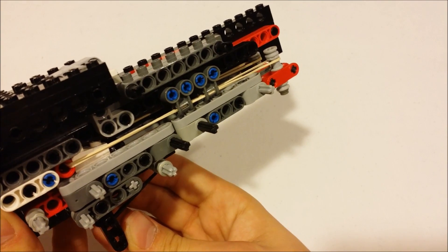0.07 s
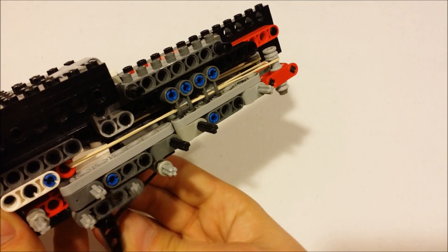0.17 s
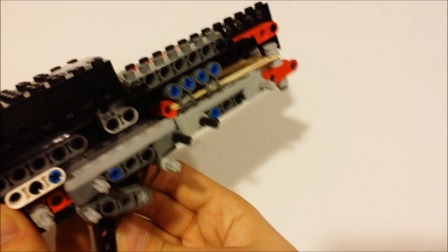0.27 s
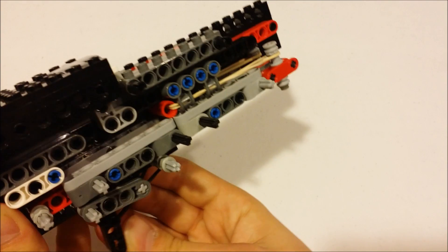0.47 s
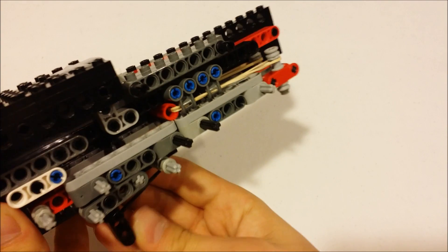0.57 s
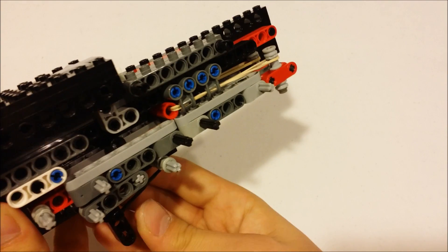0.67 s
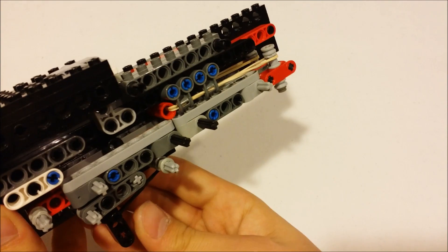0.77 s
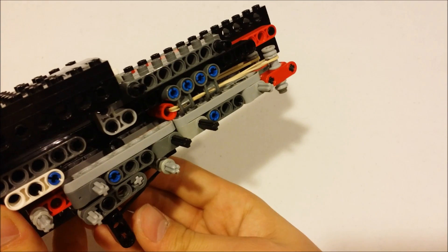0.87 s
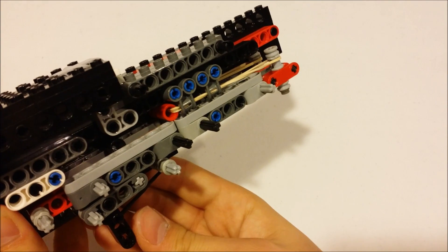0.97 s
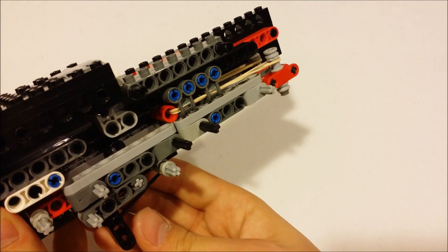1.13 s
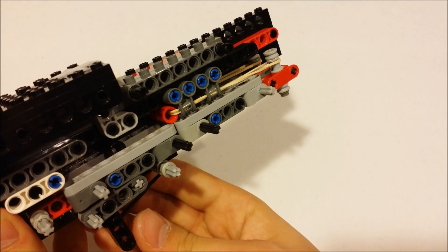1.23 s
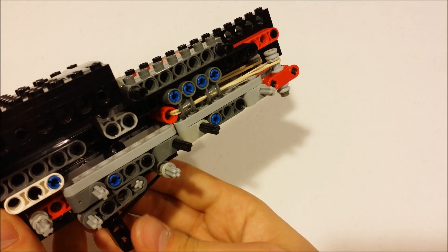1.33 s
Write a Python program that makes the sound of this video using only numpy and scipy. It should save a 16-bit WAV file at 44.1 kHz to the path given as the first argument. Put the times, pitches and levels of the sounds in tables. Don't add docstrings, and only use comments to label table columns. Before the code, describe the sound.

A hard plastic snap from a rubber-band toy shooter, then a small brick clatters down nearby

```python
import sys
import numpy as np
from scipy import signal
from scipy.io import wavfile
from scipy.ndimage import uniform_filter1d

SR = 44100
rng = np.random.default_rng(int(sys.argv[2]) if len(sys.argv) > 2 else 0)


def wav_out(sig):
    wavfile.write(sys.argv[1], SR, np.round(np.clip(np.atleast_2d(sig).T, -1, 1) * 32767).astype(np.int16))


def volts_from_decibels(level):
    exponent = np.asarray(level, float) / 20
    return 10 ** exponent


N = 61739


def evened(x):
    return x / np.sqrt(np.mean(x ** 2) + 1e-20)


def read(points, hz):
    f, value = np.transpose(points)
    return np.interp(np.log(hz + 1), np.log(f + 1), value)


def curve(points, column):
    rows = np.transpose(points)
    return np.interp(np.arange(N) / SR, rows[0], rows[column])


def sides(pan_db):
    return np.array([[pan_db / 2], [-pan_db / 2]])


def coloured(x, spectrum):
    hz = abs(np.fft.fftfreq(4096, 1 / SR))
    log_gain = np.log(volts_from_decibels(np.maximum(read(spectrum, hz), -100)))
    taps = np.fft.ifft(np.exp(np.conj(signal.hilbert(log_gain)))).real[:2048]
    return signal.fftconvolve(x, taps[None] / np.linalg.norm(taps), axes=1)[:, :N]


def resonate(x, hz, width_hz):
    r = np.exp(-np.pi * width_hz / SR)
    return signal.lfilter([1 - r, 0, r - 1], [1, -2 * r * np.cos(2 * np.pi * hz / SR), r * r], x)


def tilted(x, treble_db):
    low = signal.lfilter([.25], [1, -.75], x)
    return low + volts_from_decibels(treble_db) * (x - low)


# f/Hz, t60/s
ROOM_DECAY = [(200, 0.61), (700, 0.34), (2000, 0.33), (5000, 0.23), (10000, 0.2), (15000, 0.21)]
MONO_HZ = 400
LATE_DB, LATE_STRETCH = -19, 2.4


def tail():
    echoes = np.zeros((2, SR // 2))
    spacing = rng.integers(0, 12, (2, (SR // 2 - 121) // 12))
    at = np.arange(120, SR // 2 - 12, 12) + spacing
    np.put_along_axis(echoes, at, rng.choice([-1., 1.], at.shape), 1)
    hz, t, z = signal.stft(echoes, SR, nperseg=256)
    alike = 1 / (1 + (hz[:, None] / MONO_HZ) ** 2)
    z = np.array([z[0], alike * z[0] + np.sqrt(1 - alike ** 2) * z[1]])
    fall_db = -60 * t / read(ROOM_DECAY, hz)[:, None]
    decay = volts_from_decibels(fall_db) + volts_from_decibels(LATE_DB + fall_db / LATE_STRETCH)
    out = signal.istft(z * decay, SR, nperseg=256)[1]
    return out / np.linalg.norm(out[0])


def room(x):
    return signal.fftconvolve(x.mean(0)[None], tail(), axes=1)[:, :N]


def capsule(x, db):
    return x + volts_from_decibels([[db - 19], [db]]) * resonate(x, 9900, 330)


def hits(rows, colour, crack_s, click, trim_db, ring_db, wet_db, wet_treble_db, wet_ring_db):
    t = np.arange(800) / SR
    direct, wet = np.zeros((2, N)), np.zeros((2, N + SR))
    for s, db, pan, treble_db in rows:
        start = round(s * SR)
        shared = 0.82 * rng.standard_normal(len(t))
        crack = (shared + 1.1 * rng.standard_normal((2, len(t)))) * np.exp(-t / crack_s)
        crack[:, 0] -= click
        crack /= np.linalg.norm(crack, axis=1)[:, None]
        echo = tail()
        direct[:, start:][:, :len(t)] += volts_from_decibels(db + trim_db + sides(pan)) * tilted(crack, treble_db)
        wet[:, start:][:, :echo.shape[1]] += volts_from_decibels(db + trim_db + sides(-2)) * tilted(echo, treble_db)
    wet = volts_from_decibels(wet_db) * tilted(tilted(wet[:, :N], wet_treble_db), wet_treble_db)
    return capsule(coloured(direct, colour), ring_db) + capsule(coloured(wet, colour), wet_ring_db)


def slips():
    slips_per_s = 2300
    height = volts_from_decibels(2.9 * np.minimum(rng.exponential(1, (3, N)), 5))
    train = height * (rng.random((3, N)) < slips_per_s / SR)
    train = train * rng.choice([-1., 1.], (3, N)) + 0.6 * rng.standard_normal((3, N))
    return evened(train[:2] + train[2])


# f/Hz, level/dB
AIR_COLOUR = [(35, -38.5), (60, -10.5), (234, -3.5), (428, -18.5), (663, -19), (798, -18), (982, -21),
              (5550, -37.5), (15000, -47)]
# f/Hz, likeness/1
AIR_LIKENESS = [(60, .9), (180, .95), (400, .75), (700, .3), (1400, -.15), (3000, 0.), (15000, 0.)]
# f/Hz, width/Hz, level/dB
HUMS = [(72, 8.3, -75.5), (150, 6.7, -71.5), (193.6, 10, -68)]


def floor():
    frames, hz = N // 256 + 5, np.fft.rfftfreq(1024, 1 / SR)
    a, b, c, d, patches = rng.standard_normal((frames, 513, 5)).T
    patches = evened(uniform_filter1d(uniform_filter1d(patches, size=10, axis=0), size=12, axis=1))
    same = np.clip(read(AIR_LIKENESS, hz), -1, 1)[:, None]
    left = a + 1j * b
    right = same * left + np.sqrt(1 - same ** 2) * (c + 1j * d)
    z = np.array([left, right]) * volts_from_decibels(read(AIR_COLOUR, hz)[:, None] + .8 * patches)
    air = volts_from_decibels(-63.5) * evened(signal.istft(z, nperseg=1024, noverlap=768)[1][:, :N])
    hum = 0
    for f, width, db in HUMS:
        hum = hum + volts_from_decibels(db) * evened(resonate(rng.standard_normal(2 * N), f, width)[N:])
    return (air + hum) * volts_from_decibels(sides(-2.4))


# t/s, level/dB
CREAK = [
    (.18, -100),
    (.205, -60.5),
    (.22, -67.5),
    (.2315, -40.5),
]


def creak():
    t = np.arange(N) / SR
    strain = volts_from_decibels(curve(CREAK, 1) - 12.5) * (t < CREAK[-1][0])
    return coloured(slips() * strain, SNAP_COLOUR)


# t/s, peak level/dB, left-right/dB, treble/dB
SNAPS = [(.2313, -22, 0, 0.), (.2329, -5, 0, 0.), (.2337, -5, 0, 0.), (.2352, -8, -2, 0.),
         (.2370, -14, 0, 0.), (.2388, -7, 0, 0.), (.2403, -12, -2, 0.), (.2426, -10, -1, 0.),
         (.2448, -12, -5, 0.), (.2578, -19, -4, 0.), (.2648, -15, -1, 0.)]
# f/Hz, level per Hz/dB
SNAP_COLOUR = [(88, -35.5), (200, -20), (1400, -14.5), (2700, -16.5), (3600, -9), (5800, -6), (9500, -7.5),
               (15000, -10)]


def snap():
    return hits(SNAPS, SNAP_COLOUR, crack_s=0.00095, click=1.5, trim_db=4.5, ring_db=14.0,
                wet_db=-18.0, wet_treble_db=8.5, wet_ring_db=-2.5)


# t/s, f/Hz, level/dB, t60/s
MODES = [(0.2355, 5624, -24, 0.023), (.239, 3520, -29, .03), (0.2334, 1382, -41, 0.073),
         (.2335, 847, -39, 0.02), (0.233, 650, -34.5, 0.021), (.2335, 150, -34, 0.038),
         (0.388, 188.7, -42.5, 0.18), (.389, 366.2, -37, 0.19), (0.39, 292, -46.5, 0.173),
         (0.404, 362.4, -32, 0.2), (0.4153, 3024, -35.5, 0.17), (0.4136, 3072, -43, 0.16),
         (0.4132, 3160, -41.5, 0.097), (0.4127, 2780, -39, 0.058), (0.4115, 4470, -43, 0.11),
         (0.934, 193.9, -36.5, 0.091), (.937, 365.3, -44, 0.21), (.945, 272.7, -45, 0.094),
         (.976, 720, -51.5, 0.13), (.936, 2530, -46, 0.099)]


def rings():
    out, t = np.zeros(N), np.arange(SR // 3) / SR
    for s, hz, db, t60 in MODES:
        start = round(s * SR)
        onset = np.minimum(t * hz / 2, 1)
        mode = volts_from_decibels(db - 60 * t / t60) * np.sin(2 * np.pi * hz * t) * onset
        room_left = len(out[start:])
        out[start:][:len(t)] += mode[:room_left]
    out = out * volts_from_decibels(sides(-3))
    return out + volts_from_decibels(-12.5) * room(out)


# t/s, peak level/dB, left-right/dB, treble/dB
CLATTER = [(.3852, -13, -3, -2.), (.3862, -17, -4, 2.), (.3885, -21, -2, -1.), (.3917, -15, -5, 2.),
           (.3975, -19, -1, 1.), (.4014, -18, -1, 1.), (.4032, -19, -4, 1.), (.4068, -18, -1, 0.),
           (.4134, -17, -3, 0.), (.4165, -19, -3, 0.), (.4225, -18, -1, 1.), (.4278, -20, -2, 0.),
           (.4335, -23, -2, 0.)]
# f/Hz, level per Hz/dB
CLATTER_COLOUR = [(88, -25.5), (150, -17), (350, -8), (1640, -12), (3150, -9.5), (8580, -16.5), (9820, -14),
                  (11000, -23), (15000, -29.5)]


def landing():
    return hits(CLATTER, CLATTER_COLOUR, crack_s=0.0037, click=6.1, trim_db=6.0, ring_db=13.0,
                wet_db=-6.0, wet_treble_db=1.43, wet_ring_db=-2.5)


# t/s, peak level/dB, left-right/dB, f/Hz
TICKS = [
    (.585, -52.5, 6, 6000),
    (1.135, -60, -5.5, 600),
    (1.146, -54, -1, 765),
    (1.2049, -64, -2, 2470),
    (1.283, -60, -5, 3940),
]


def ticks():
    out, t = np.zeros((2, N)), np.arange(1500) / SR
    for s, db, pan, hz in TICKS:
        push = rng.standard_normal(len(t)) * np.exp(-t * hz / 7.7)
        knock = resonate(resonate(push, hz, 0.94 * hz), hz, 1.04 * hz)
        out[:, round(s * SR):][:, :len(t)] += volts_from_decibels(db + sides(pan)) * knock / abs(knock).max()
    return out + volts_from_decibels(-7.0) * room(out)


# t/s, peak level/dB, left-right/dB, treble/dB
BOUNCE = [
    (.9345, -35, -3, -4.),
    (.9385, -35, -3, -1.),
    (.9415, -35, -3, -1.),
    (.9465, -33, -3, 0.),
    (.9502, -29, -4, 4.),
    (.9560, -36, -3, 0.),
    (.9630, -38, -3, -3.),
    (.9760, -34, -3, -10.),
    (.9870, -36, -3, -8.),
]
# f/Hz, level per Hz/dB
BOUNCE_COLOUR = [(88, -34), (150, -27), (371, -13.5), (728, -10), (1300, -6), (2060, -11.5), (2700, -8.5),
                 (6430, -8.5), (15000, -19.5)]


def bounce():
    return hits(BOUNCE, BOUNCE_COLOUR, crack_s=0.0032, click=1.8, trim_db=15.5, ring_db=-6.,
                wet_db=-1.0, wet_treble_db=-2.5, wet_ring_db=-17.0)


# t/s, level/dB, brightness/1
SLIDE = [
    (1.195, -88, 0.1),
    (1.205, -56.5, 0.),
    (1.225, -55.5, 0.05),
    (1.255, -60.5, 0.8),
    (1.268, -51.5, 0.92),
    (1.3, -56, 0.7),
    (1.384, -66, 0.42),
    (1.4, -93, 0.64),
]
# f/Hz, level/dB
SLIDE_DULL = [(290, -23), (500, -4), (1370, -11), (3270, -10.5), (4670, -15), (5090, -14.5), (15000, -44)]
# f/Hz, level/dB
SLIDE_BRIGHT = [(290, -42.5), (500, -13), (990, -8.5), (1520, -14.5), (3880, -11), (4740, -14.5),
                (10200, -12.5), (15000, -38)]


def slide():
    t, grain = np.arange(N) / SR, slips()
    bright = np.clip(curve(SLIDE, 2), 0, 1)
    rub = (1 - bright) * coloured(grain, SLIDE_DULL) + bright * coloured(grain, SLIDE_BRIGHT)
    squeak = evened(resonate(resonate(grain, 9940, 310), 9940, 930))
    rub = rub + bright ** 3 * squeak
    rub = rub * volts_from_decibels(curve(SLIDE, 1) - 6.5 + sides(-3)) * (t > SLIDE[0][0])
    return rub + volts_from_decibels(-3.0) * room(rub)


def scene():
    toy = creak() + snap() + ticks() + slide()
    brick = landing() + bounce()
    return floor() + toy + brick + rings()


# t/s, gain/dB
GAIN = [(0, 16.5), (.219, 16.5), (.2205, -9), (.2275, 0), (.2322, 3), (.2445, 3), (.2465, 5), (.38, 3.5),
        (.6, 0.5), (.9, -1.5), (1.1, 3), (1.4, 5)]


def gain_control(x):
    return x * volts_from_decibels(curve(GAIN, 1))


def top_cut(x):
    return signal.sosfilt(signal.butter(12, 17180, fs=SR, output="sos"), x)


def record(dry):
    low_cut = signal.butter(5, 52, "high", fs=SR, output="sos")
    high_cut = signal.firwin(151, 15450, window=("kaiser", 6), fs=SR)
    limited = signal.oaconvolve(signal.sosfilt(low_cut, dry), high_cut[None], "same")
    return top_cut(gain_control(limited))


dry = scene()
out = record(dry)
wav_out(out)
```